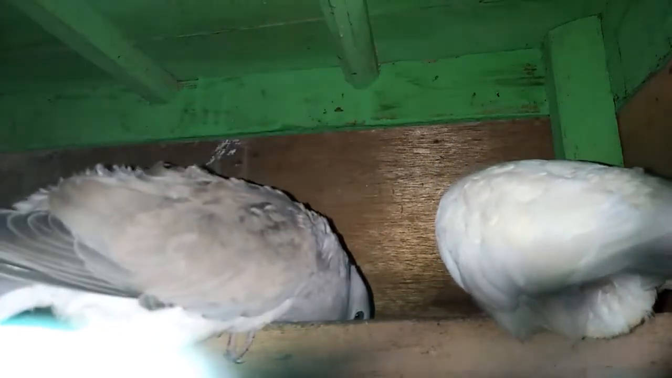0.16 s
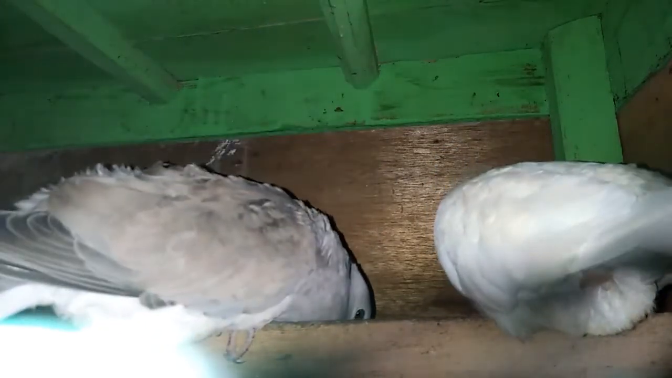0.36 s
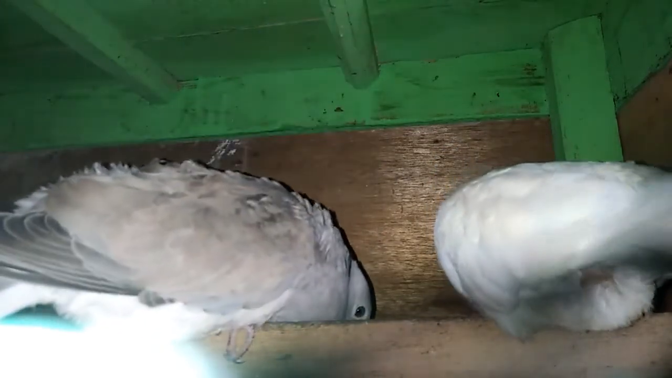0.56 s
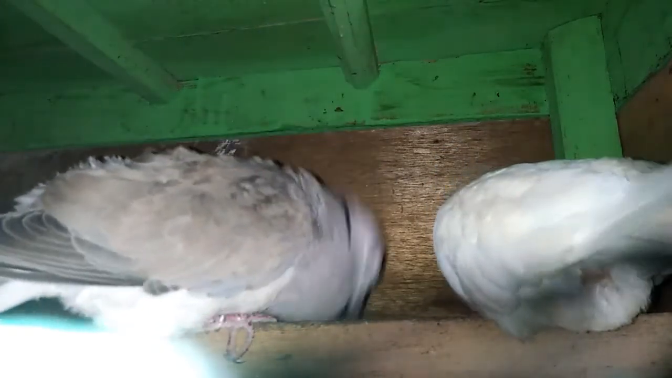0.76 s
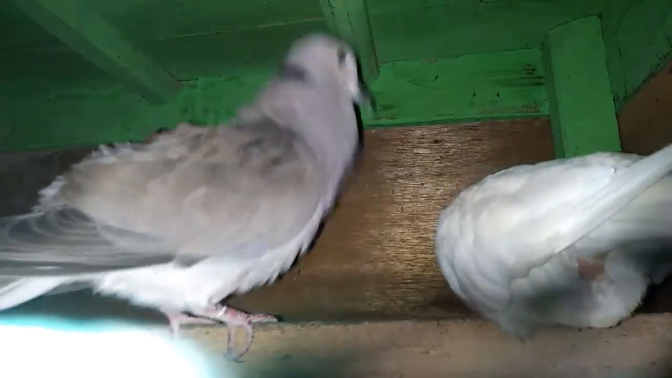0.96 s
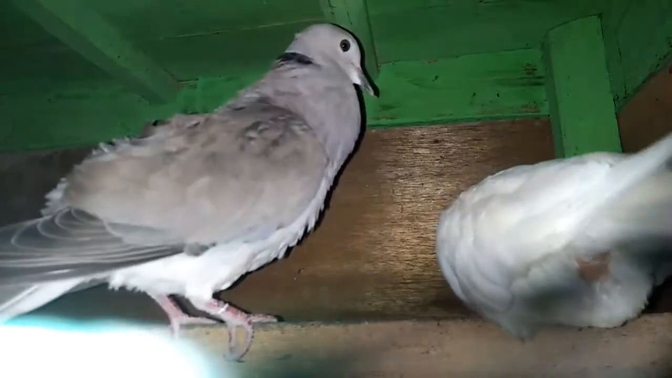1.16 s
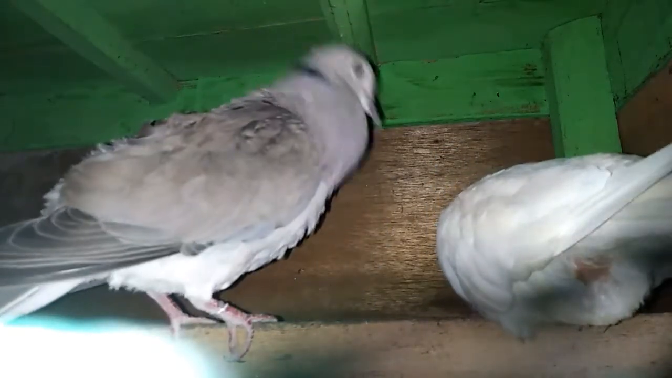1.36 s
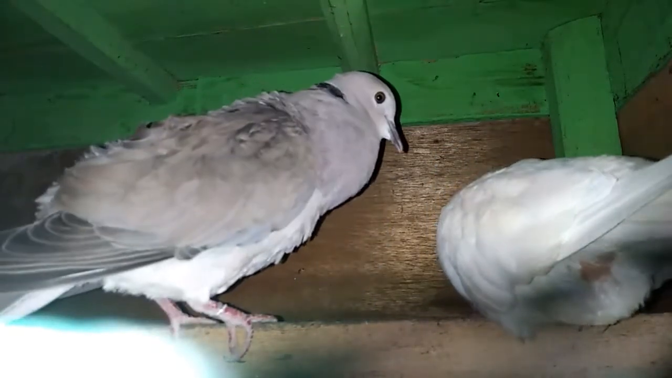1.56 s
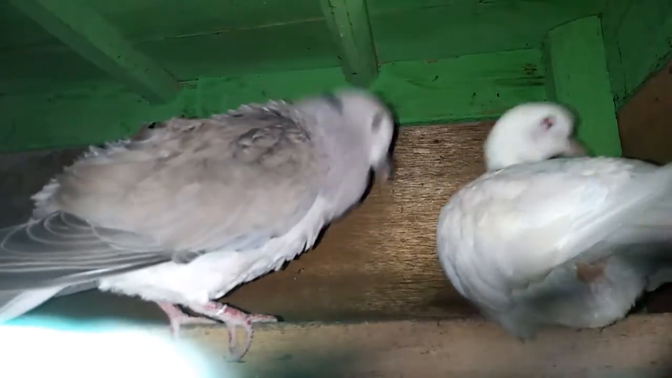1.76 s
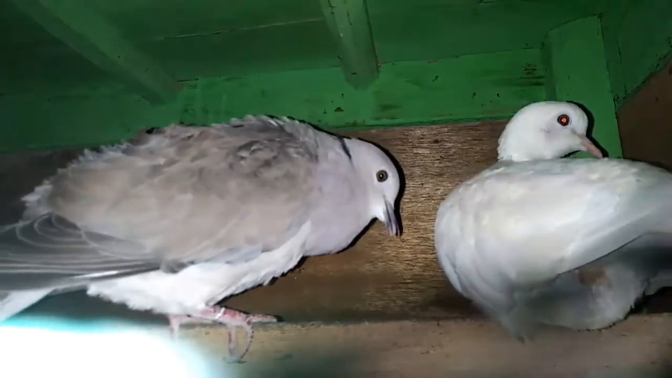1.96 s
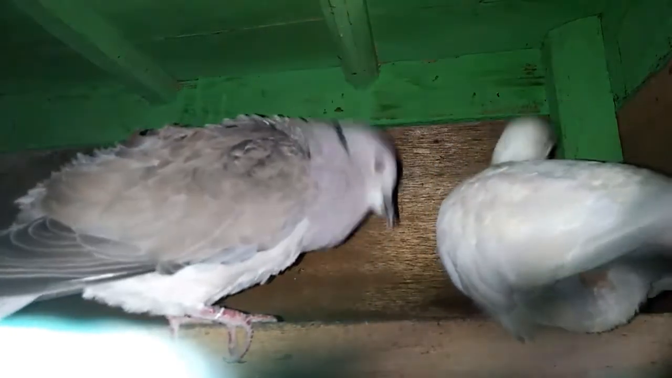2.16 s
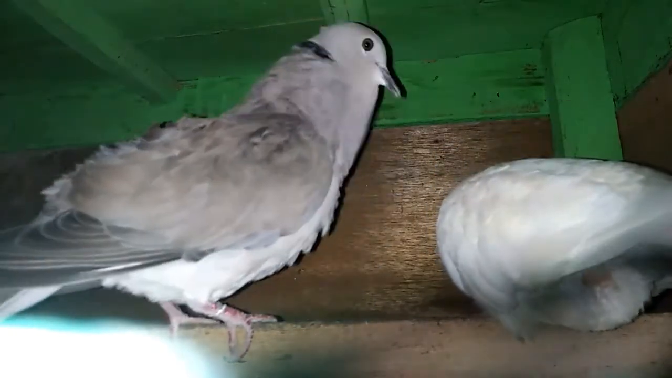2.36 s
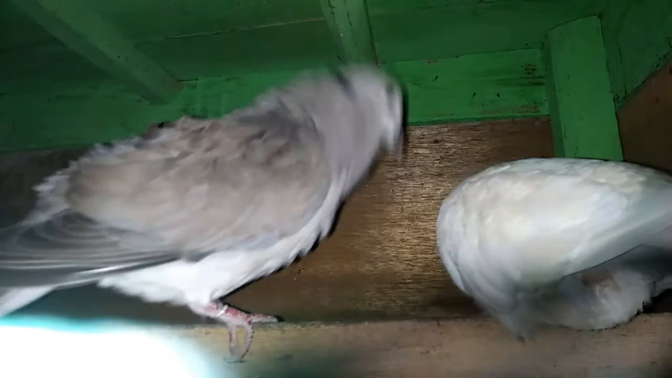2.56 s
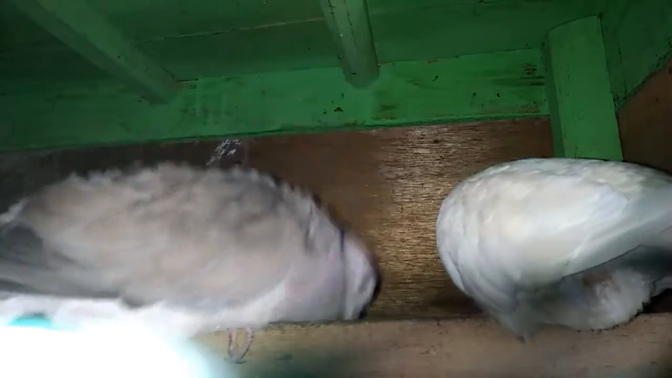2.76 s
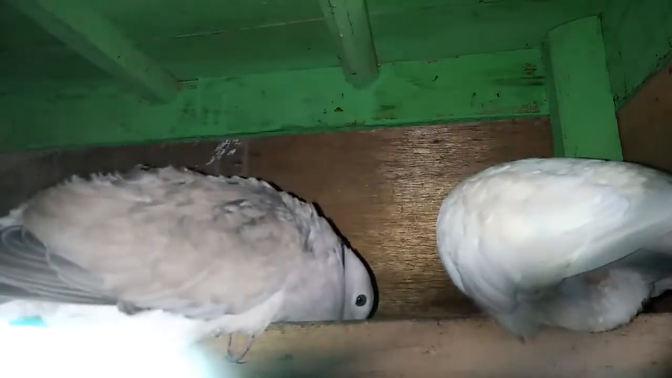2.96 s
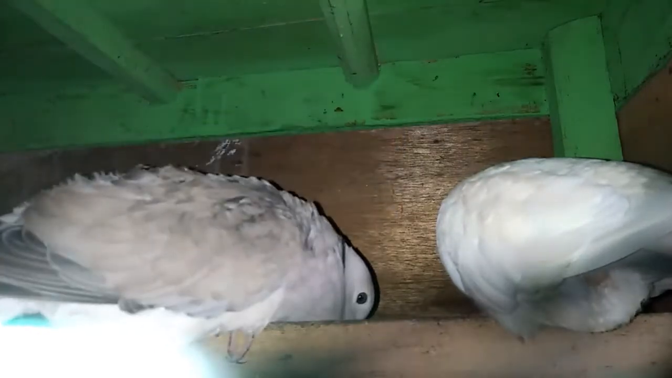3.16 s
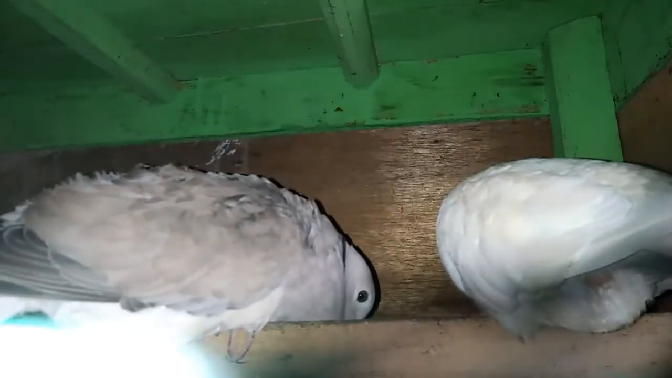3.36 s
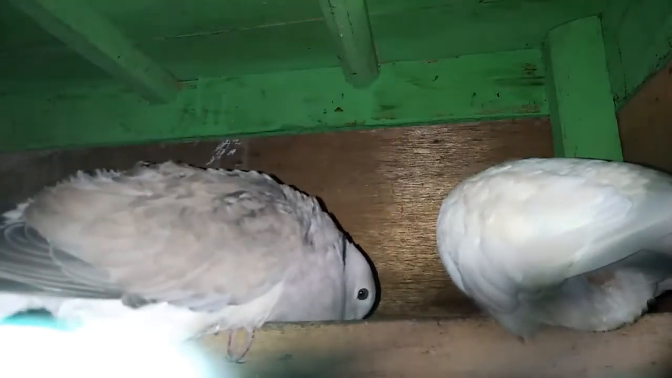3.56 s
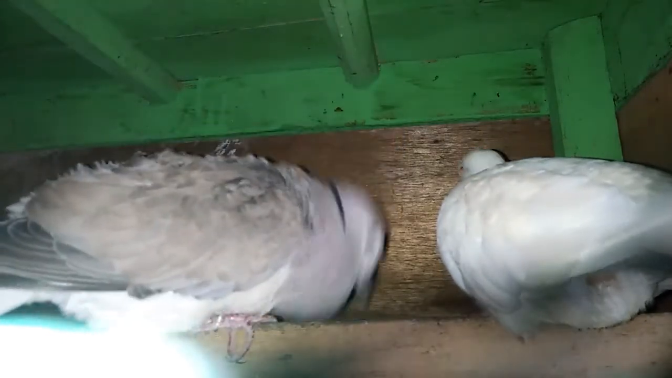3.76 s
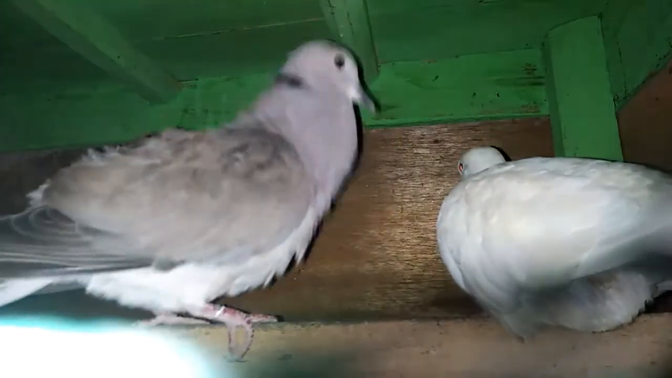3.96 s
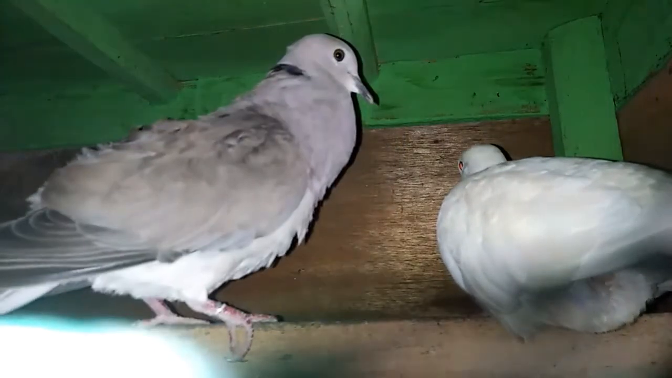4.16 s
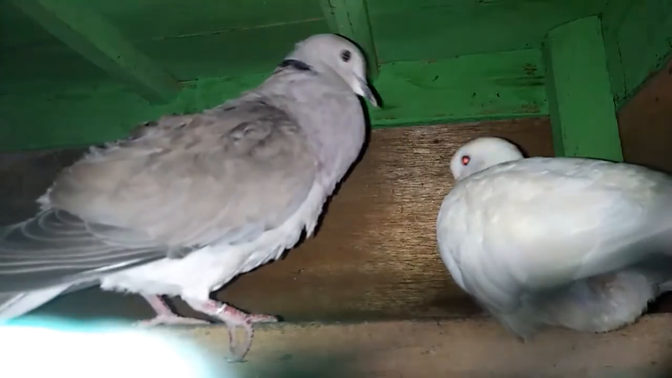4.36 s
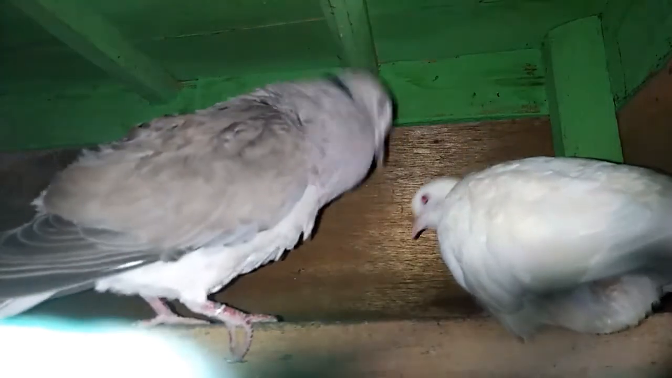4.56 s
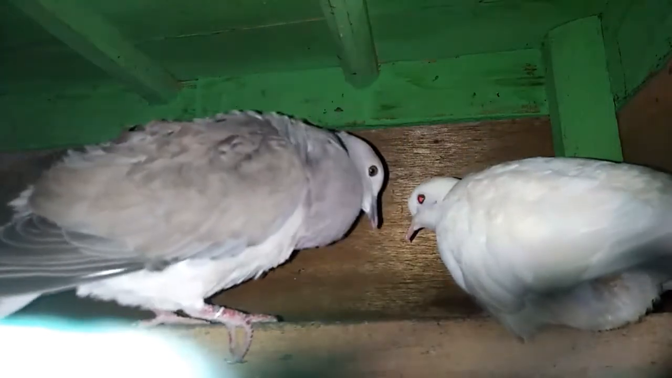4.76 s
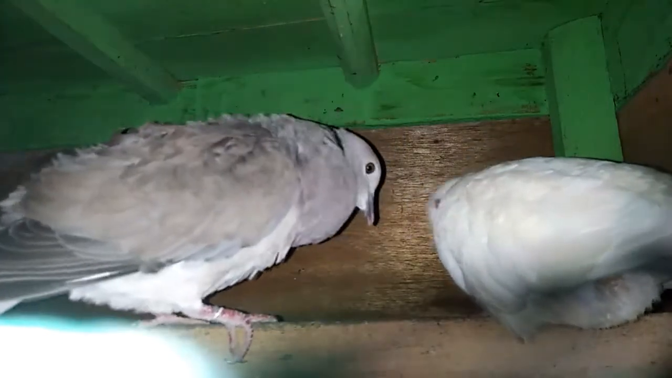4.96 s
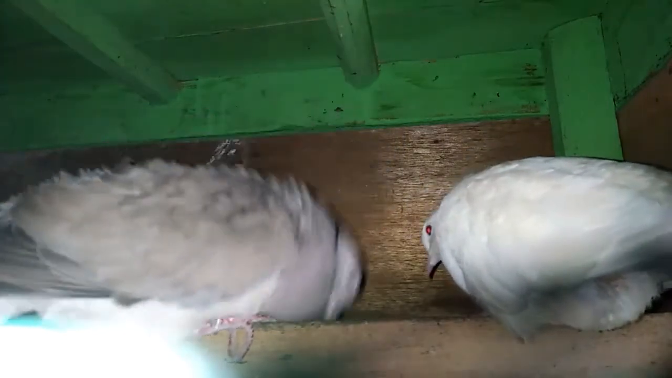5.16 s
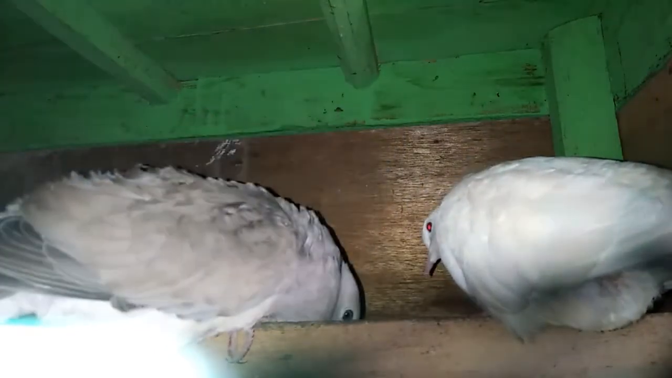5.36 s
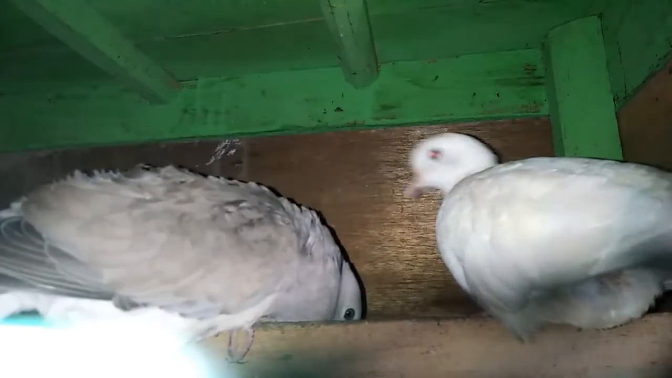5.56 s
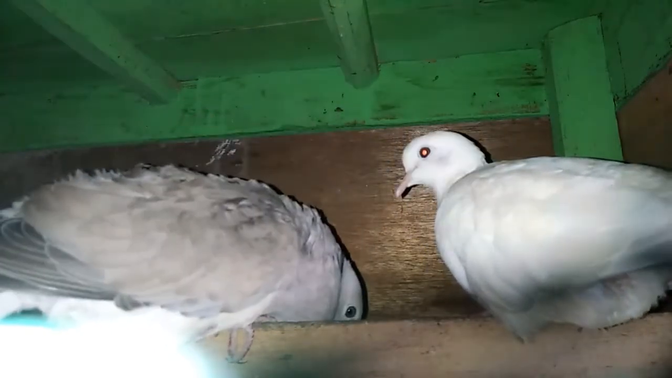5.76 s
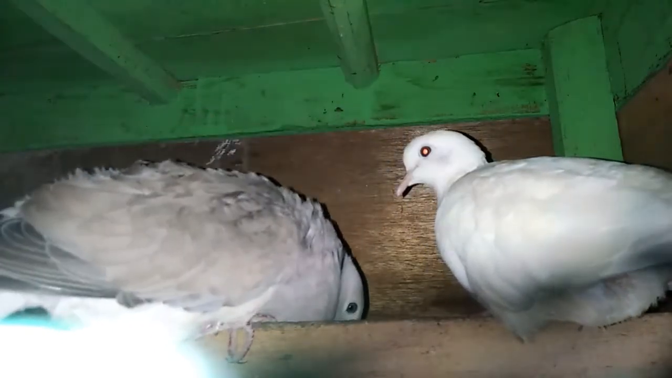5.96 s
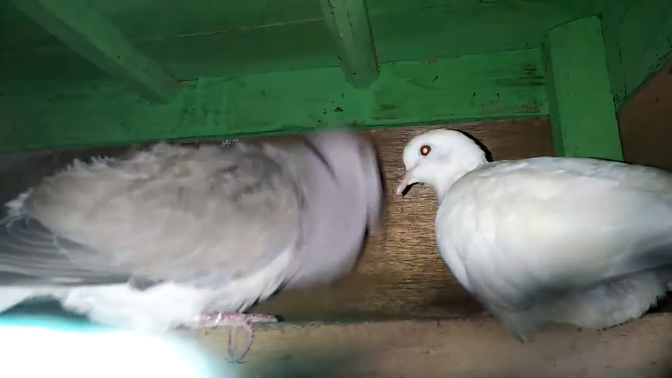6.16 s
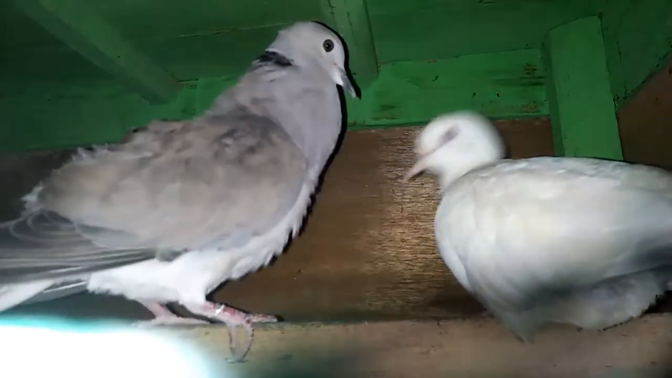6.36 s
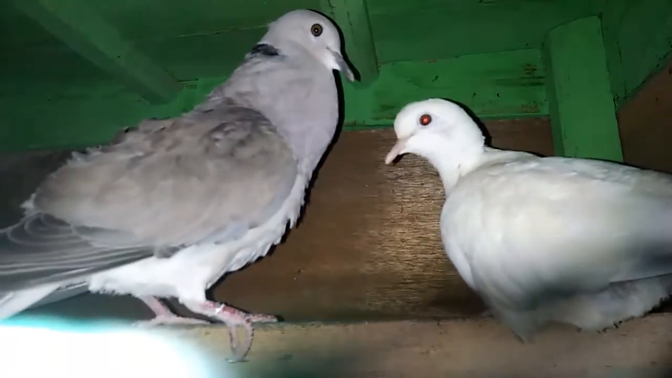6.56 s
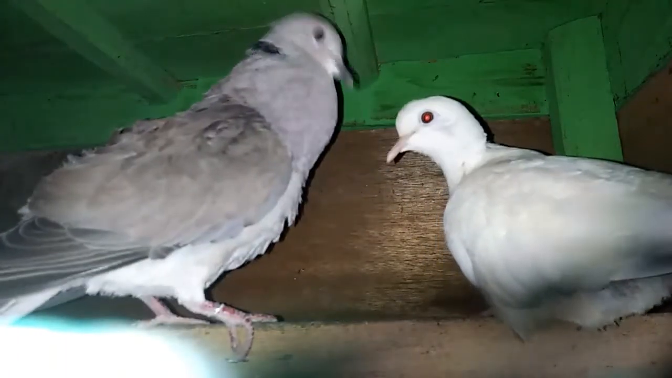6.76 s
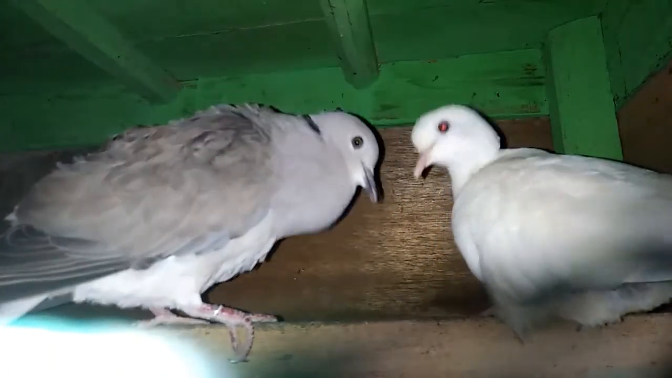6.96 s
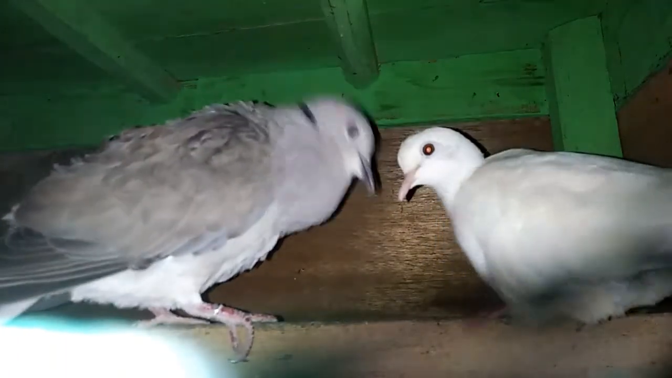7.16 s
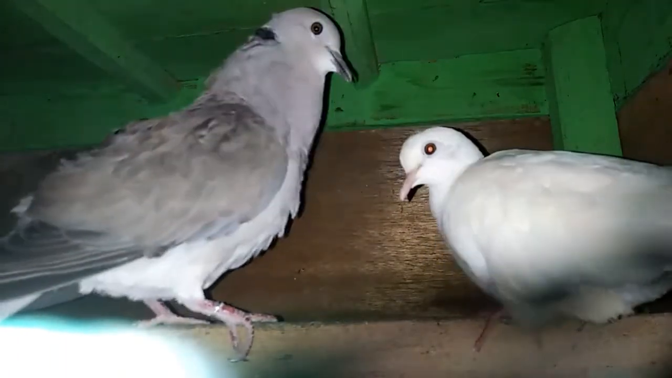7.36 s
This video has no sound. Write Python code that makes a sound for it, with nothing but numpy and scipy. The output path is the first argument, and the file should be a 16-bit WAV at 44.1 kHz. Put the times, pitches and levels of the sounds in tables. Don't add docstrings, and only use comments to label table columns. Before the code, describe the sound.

A dove coos very close in a small wooden coop on a quiet night. At 0 s the end of a coo falls away. From 0.2 s short, dipping notes ripple and lengthen, leading at about 0.8 s into a round held coo that swells, sags and drops off at 1.5 s; a faint low growl follows until 2.1 s. At 2.7 s toes tap and a sharp scuff brushes the boards with a short call. A second ripple starts at 3.1 s, the long coo at 3.7 s, ending near 4.6 s, then a growl at 4.8 s. A distant vehicle nears and fades around 5.1 s as wind rumbles more. Another call comes at 5.2 s, a ripple at 5.6 s, a faint wire scrape at 6.1 s, and a held coo from 6.2 to 6.9 s. A last growl at 7.1 s and light taps at 7.4 s close it. Soft feather rustles and a faint motor hum lie beneath.

```python
import sys
import numpy as np
from scipy import signal
from scipy.io import wavfile
from scipy.ndimage import uniform_filter1d

SR = 44100
rng = np.random.default_rng(int(sys.argv[2]) if len(sys.argv) > 2 else 0)


def output_pcm(signal):
    pcm = np.clip(np.atleast_2d(signal).T, -1, 1) * 32767
    wavfile.write(sys.argv[1], SR, np.round(pcm).astype(np.int16))


def field_ratio(decibels):
    return 10 ** (np.asarray(decibels, dtype=float) / 20)


N = 327222


def evened(x):
    return x / np.sqrt(np.mean(x ** 2) + 1e-20)


def add(mix, s, sound):
    part = mix[round(s * SR):][:len(sound)]
    part += sound[:len(part)]


def columns(rows):
    s, *cols = np.transpose(rows)
    t = np.arange(s[0], s[-1], 1 / SR)
    return s[0], [np.interp(t, s, c) for c in cols]


def resonate(x, hz, width):
    turn = np.exp(2j * np.pi * np.cumsum(hz * np.ones(len(x))) / SR)
    r = np.exp(-np.pi * width / SR)
    smooth = signal.lfilter([1 - r], [1, -r], x / turn + 1e-18)
    return 2 * (turn * smooth).real


def noise(points, patchy_db, size=1024):
    hz, (f, level) = np.fft.rfftfreq(size, 1 / SR), np.transpose(points)
    a, b, patches = rng.standard_normal((N * 4 // size + 5, len(hz), 3)).T
    patches = uniform_filter1d(patches, size=6, axis=0)
    patches = evened(uniform_filter1d(patches, size=8, axis=1))
    colour_db = np.interp(np.log(hz + 1), np.log(f + 1), level, left=-120, right=-120)
    frames = (a + 1j * b) * field_ratio(colour_db[:, None] + patchy_db * patches)
    return evened(signal.istft(frames, nperseg=size, noverlap=size * 3 // 4)[1][:N])


def voice(hz, partials_db, rise, fall):
    turns, t = np.cumsum(hz) / SR + rng.random(), np.arange(len(hz)) / SR
    ends = np.minimum(t / rise, 1) * np.minimum(t[::-1] / fall, 1)
    partials = sum(field_ratio(db) * np.sin(2 * np.pi * (k + 1) * turns) for k, db in enumerate(partials_db))
    return np.sqrt(2) * ends * partials


def held_notes():
    # start_s, pitch_hz, level_db
    held = [
        [(0.765, 519, -45.5), (0.875, 510, -45.8), (0.935, 507.6, -61), (0.965, 508.3, -46), (1.05, 510, -35),
         (1.2, 510.9, -32.4), (1.28, 507.5, -30.7), (1.38, 500.5, -27.8), (1.46, 487, -26.8)],
        [(3.722, 518, -46.5), (3.86, 506.5, -51.4), (3.905, 509.5, -59.9), (3.985, 511, -41.8),
         (4.07, 515.2, -38.4), (4.22, 511.7, -34.6), (4.38, 505.1, -29.4), (4.5, 490.1, -25.6),
         (4.527, 482.2, -25.6)],
        [(6.245, 515, -43.3), (6.285, 516.5, -59), (6.335, 511.5, -43.8), (6.4, 508.8, -34.5),
         (6.54, 512, -33.6), (6.72, 506.1, -28.6), (6.79, 501.6, -27.1), (6.868, 490, -25.2),
         (6.886, 482.4, -23.8)],
    ]
    even_db = [-21, -17]
    # freq_hz, level_db (per Hz)
    breath = [(230, -16), (300, -5.5), (370, -15), (440, -2), (580, -2.5), (660, -8.5), (1050, -8.5),
              (4000, -36)]
    stop_s, fall_s = 0.017, 0.011
    out, air = np.zeros(N), noise(breath, 2.2)
    for rows in held:
        s, curves = columns(rows)
        curves = [np.pad(c, (0, round(stop_s * SR)), "edge") for c in curves]
        hz, first_db = (uniform_filter1d(c, size=500) for c in curves)
        full = np.clip(1 + (np.maximum.accumulate(first_db) + 39) / 11, 0, 1)
        sag_db = 0.63 * np.maximum(509.6 - hz, 0) ** 1.08
        third_db = -64.5 + 6 * full - full * sag_db
        waver = uniform_filter1d(rng.standard_normal(len(hz)), size=500)
        hz = hz * (1 + 0.04 * waver)
        flutter = uniform_filter1d(rng.standard_normal(len(hz)), size=200)
        shimmer_db = 0.35 * evened(uniform_filter1d(flutter, size=200))
        first_db = first_db + 0.3 + shimmer_db
        third_db = third_db + 3 * shimmer_db
        second_db = third_db + even_db[0]
        fourth_db = third_db + even_db[1] + 8 * (full - 1)
        add(out, s, voice(hz, [first_db, second_db, third_db, fourth_db], 0.0051, fall_s))
        puff = field_ratio(-53.5 + 0.45 * first_db) * signal.windows.tukey(len(hz), 0.06)
        add(out, s, puff * air[round(s * SR):][:len(hz)])
    return out


def short_voice(hz):
    partials_db = [-3, -12.5, -28, -20.5]
    partials_tilt_db = [6, -7.5, 13, -13]
    low_hz, rise_s = 340, 0.012
    t = np.arange(len(hz)) / SR
    late_db = -14 * np.maximum(1 - t / rise_s, 0)
    flutter_db = 3.5 * np.sin(2 * np.pi * (t * rng.uniform(18, 30) + rng.random()))
    upper_db = late_db + flutter_db
    levels = [db + tilt_db * (hz - low_hz) / 100 + (k > 0) * upper_db
              for k, (db, tilt_db) in enumerate(zip(partials_db, partials_tilt_db))]
    return voice(hz, levels, 0.0021, 0.005)


def ripple_pitch(length, start, end):
    u = np.linspace(0, 1, round(length * SR))
    dip_hz = 351 - 78 * np.exp(-(length / 0.043) ** 1.9)
    snap = np.exp(-(u / min(0.24 / length, 0.24)) ** 5.7)
    climb = np.maximum(1 - (1 - u) / 0.39, 0) ** 0.63
    scoop_hz = 77 * np.exp(-u * length / 0.0046)
    return dip_hz + (start - dip_hz) * snap + (end - dip_hz) * climb - scoop_hz


def short_notes():
    # start_s, length_s, start_hz, end_hz, effort_db
    ripple = [(0.203, 0.0079, 330, 291, -66.5), (0.259, 0.024, 282, 327, -64),
              (0.322, 0.039, 409, 306, -63), (0.396, 0.058, 427, 363, -58.5), (0.467, 0.061, 462, 351, -58),
              (0.551, 0.075, 452, 368, -52), (0.654, 0.106, 478, 483, -51.5),
              (3.124, 0.021, 280, 332, -64.5), (3.188, 0.029, 344, 322, -63),
              (3.254, 0.037, 393, 294, -62.5), (3.321, 0.057, 385, 360, -56.5),
              (3.397, 0.065, 459, 340, -59.5), (3.484, 0.088, 446.4, 441, -54),
              (3.603, 0.12, 466, 480, -52.5), (5.624, 0.031, 279, 275, -71.5),
              (5.687, 0.034, 343, 330, -64.5), (5.756, 0.043, 403, 374, -60),
              (5.83, 0.059, 440, 376, -59.5), (5.912, 0.075, 464, 367, -56),
              (6.003, 0.094, 467, 466, -52.5), (6.128, 0.12, 477, 480, -54)]
    # start_s, pitch_hz, effort_db
    short_calls = [
        [(2.729, 286, -62.5), (2.761, 416, -51), (2.778, 405, -50), (2.778, 496, -57), (2.808, 516.3, -55),
         (2.852, 504, -69), (2.875, 500, -53.5), (2.877, 420, -56), (2.893, 402, -60.5)],
        [(5.218, 289.7, -64.5), (5.26, 429.7, -48), (5.27, 432, -54.5), (5.274, 540.4, -60.5),
         (5.295, 511, -68.5), (5.318, 501, -57), (5.375, 496, -53.5), (5.389, 400, -56)],
    ]
    # start_s, pitch_hz, effort_db
    drops = [
        [(0, 488, -62), (.03, 467, -102), (.07, 412, -74)],
        [(1.464, 447, -56.5), (1.488, 371, -49.5), (1.53, 315, -67)],
        [(4.53, 444, -57.5), (4.57, 393, -49.5), (4.63, 316.6, -61.5)],
        [(6.888, 457, -60), (6.912, 369, -52.5), (6.955, 306, -65)],
    ]
    # freq_hz, width_hz, gain_db
    coop = [(319.2, 25, 13), (428.6, 32.5, 13), (466, 27.9, 10.5), (563.6, 28, 18.5), (717, 14, -1.5),
            (828, 21, 6.5), (1290, 21, 0.5), (1524, 24, -2.5)]
    out = np.zeros(N)
    for s, length, start, end, db in ripple:
        add(out, s, field_ratio(db) * short_voice(ripple_pitch(length, start, end)))
    for rows in short_calls + drops:
        s, (hz, db) = columns(rows)
        add(out, s, field_ratio(db) * short_voice(uniform_filter1d(hz, size=300)))
    return sum(field_ratio(db) * resonate(out, hz, width) for hz, width, db in coop)


def growl():
    # start_s, length_s, pulse_rate_hz, level_db, throat_start_hz
    growls = [
        (1.6, 0.2, 168, -63, 555),
        (1.77, 0.307, 107, -58, 580),
        (4.797, 0.342, 109.8, -56.5, 562),
        (7.121, 0.37, 106.7, -57.5, 565.5),
    ]
    out = np.zeros(N)
    for s, length, rate_hz, db, start_hz in growls:
        t = np.arange(0, length, 1 / SR)
        hz = rate_hz * (1 + 0.074 * np.exp(-t / 0.0511) + 0.1 * (t / length) ** 3)
        throat_hz = start_hz + 244 * t
        jitter = 0.18 * uniform_filter1d(rng.standard_normal(len(hz)), size=300)
        turns = np.cumsum(hz * (1 + jitter)) / SR
        sound = sum(np.cos(2 * np.pi * k * turns) for k in range(3, 13))
        sound = sound + 3.5 * (turns % 1 < 0.5) * rng.standard_normal(len(hz))
        for width_hz in (125, 160, 170):
            sound = resonate(sound, throat_hz, width_hz)
        chest = field_ratio(-18.5) * np.sin(2 * np.pi * turns)
        level = field_ratio(db - 3 * np.sin(np.pi * t / length))
        ends = np.minimum(t / 0.025, 1) * np.minimum(t[::-1] / 0.09, 1)
        add(out, s, level * (evened(sound) + chest) * ends)
    return out


def side_tones():
    # start_s, length_s, pitch_hz, level_db
    tones = [
        (3.797, .2, 408, -69.5),
        (3.793, 0.17, 596, -70.5),
        (6.298, .56, 311.7, -71.5),
    ]
    out = np.zeros(N)
    for s, length, hz, db in tones:
        t = np.arange(0, length, 1 / SR)
        tone = resonate(np.sin(2 * np.pi * hz * t) + 12 * rng.standard_normal(len(t)), hz, 14)
        add(out, s, field_ratio(db) * evened(tone) * signal.windows.tukey(len(t), 0.4))
    return out


def wall(x):
    echo_s, echo_db = 0.0515, -19.5
    out = np.zeros(N)
    for k in (1, 2, 3):
        add(out, k * echo_s, field_ratio(k * echo_db) * resonate(x, 480, 120))
    return out


def yard(x):
    t60_s, spacing = 0.3, 22
    taps = np.zeros(SR // 2)
    at = np.arange(200, len(taps) - spacing, spacing)
    signs = rng.choice([-1., 1.], len(at))
    taps[at + rng.integers(0, spacing, len(at))] = signs * field_ratio(-60 * at / SR / t60_s)
    return signal.fftconvolve(x, taps / np.linalg.norm(taps))[:N]


def scuffs():
    # start_s, level_db, stroke_s, t60_s, low_band_db
    brushes = [
        (1.39, -70.5, 0.014, 0.17, 0),
        (2.694, -99.5, 0.005, 0.36, 28.5),
        (2.774, -68, .045, .064, .5),
        (2.792, -52, 0.017, .23, -14),
        (2.833, -66.5, 0.044, .11, -5.5),
        (5.136, -71, .04, .15, 9.5),
        (6.093, -76.5, .063, 0.056, -15),
        (7.363, -86, 0.13, .1, 16),
    ]
    # freq_hz, level_db (per Hz)
    bright = [(1760, -46.5), (3000, -17.5), (3420, -11.5), (4880, -8.5), (5420, -7), (7440, 2.5),
              (8200, -1), (13700, -10), (14200, 0)]
    # freq_hz, level_db (per Hz)
    dull = [(400, -27), (600, -5), (1100, 6.5), (1800, -1), (2800, -5.5), (4500, -41)]
    high, low = noise(bright, 2.5, size=256), noise(dull, 2.5, size=256)
    out, t = np.zeros(N), np.arange(SR // 3) / SR
    for s, db, stroke, t60, low_db in brushes:
        brush = (high + field_ratio(low_db) * low)[round(s * SR):][:len(t)]
        swell = np.minimum(t / (0.32 * stroke), 1)
        shape = swell * field_ratio(db - 60 * np.maximum(t - stroke, 0) / t60)
        add(out, s, brush * shape[:len(brush)])
    return out


def wire_drag():
    # freq_hz, width_hz, level_db
    wire = [(2630, 230, -1), (4120, 69, 2), (5630, 42, 4), (6260, 23, 13), (9030, 35, -18),
            (10300, 170, -33)]
    start_s, length_s, level_db = 6.094, 0.045, -72
    out, t = np.zeros(N), np.arange(SR // 3) / SR
    drag = rng.standard_normal(len(t)) * field_ratio(-13 * (t / length_s) ** 2)
    wires = sum(field_ratio(db) * resonate(drag, hz, 2.7 * width) for hz, width, db in wire)
    add(out, start_s, field_ratio(level_db) * evened(wires))
    return out


def knocks():
    # start_s, pitch_hz, level_db, t60_s
    toes = [
        (2.694, 590, -57, .03),
        (2.694, 1900, -64, .02),
        (2.705, 1000, -66, .03),
        (2.665, 760, -66, .08),
        (7.365, 1240, -63, .12),
        (7.37, 900, -64, .15),
        (7.4, 1150, -58, .06),
        (7.403, 880, -58, .06),
    ]
    out, t = np.zeros(N), np.arange(SR // 10) / SR
    for s, hz, db, t60 in toes:
        strike = np.minimum(t / 0.00033, 1)
        add(out, s, field_ratio(db - 60 * t / t60) * strike * np.sin(2 * np.pi * hz * t))
    return out


def feathers():
    # start_s, length_s, level_db, rise_share
    rustle = [
        (1.085, .24, -81, 0.28),
        (1.296, .17, -74, 0.075),
        (3.477, 0.089, -81, 0.51),
        (3.988, .2, -84.5, 0.16),
        (4.26, .29, -84.5, 0.17),
        (5.477, 0.14, -75, 0.52),
        (6.375, 0.61, -81.5, 0.17),
    ]
    # freq_hz, level_db (per Hz)
    feather = [(2650, -41), (4500, -12.5), (6060, -13.5), (7440, -3), (8390, 0), (10100, -3), (11000, -6.5),
               (14200, -11.5)]
    gain = np.zeros(N)
    for s, length, db, rise in rustle:
        u = np.linspace(0, 1, round(length * SR))
        edge = np.maximum(1 - u / rise, 0.34 * (u - rise) / (1 - rise))
        add(gain, s, field_ratio(db - 11 * edge) * signal.windows.tukey(len(u), 0.15))
    return gain * noise(feather, 1.3, size=256)


def wind_gusts():
    # peak_s, half_width_s, level_db
    gusts = [(0.0, 0.01, -60), (0.42, .08, -74.5), (0.72, 0.16, -77), (1.0, .1, -81.5), (1.2, 0.11, -71),
             (1.42, 0.15, -71), (1.6, 0.07, -70.5), (1.8, 0.14, -73), (2.07, .035, -67),
             (2.35, 0.098, -76.5), (2.7, 0.12, -72), (2.921, 0.1, -70.5), (3.25, 0.096, -72.5),
             (3.6, 0.14, -71.5), (3.95, 0.15, -71.5), (4.352, 0.23, -67), (4.599, 0.018, -64),
             (4.95, 0.22, -60.5), (5.27, 0.059, -63), (5.501, 0.22, -65.5), (5.9, 0.081, -60),
             (6.08, 0.19, -67.5), (6.451, 0.17, -78), (6.799, .1, -73), (7.24, 0.083, -58.5),
             (7.38, 0.091, -64)]
    # freq_hz, level_db (per Hz)
    rumble = [(25, -42), (42, -19), (59, -4.5), (111, 2), (161, -0.5), (199, -24), (230, -11), (300, -43.5),
              (510, -120)]
    t, wind = np.arange(N) / SR, noise(rumble, 2., size=2048)
    calm_db = -86.5
    gain = field_ratio(calm_db) + sum(field_ratio(db) * np.exp(-((t - s) / width) ** 2) for s, width, db in gusts)
    boom = field_ratio(-8.5) * resonate(wind, 113, 19)
    return gain * evened(wind + boom)


def vehicle():
    # freq_hz, level_db (per Hz)
    road = [(120, -43.5), (200, -17.5), (232, -22), (306, 4), (435, -33), (530, -9.5), (640, 0),
            (1090, -2.5), (1710, -14.5), (4000, -58), (5200, -82), (8800, -120)]
    # freq_hz, level_db (per Hz)
    engine = [(30, -50), (45, -18), (58, 2), (85, -3.5), (120, -32.5)]
    pass_s, near_db_per_s, away_db_per_s, round_s = 5.144, 16.5, 43, 0.18
    t = np.arange(N) / SR
    slope_db = np.where(t < pass_s, near_db_per_s, away_db_per_s) * abs(t - pass_s)
    slope_db = uniform_filter1d(slope_db, round(round_s * SR))
    tyres = field_ratio(-55.5 - slope_db) * noise(road, 2.)
    swell = field_ratio(-66) * np.exp(-((t - 5.5) / 0.75) ** 2)
    return tyres + swell * noise(engine, 1.4, size=2048)


def far_motor():
    # freq_hz, level_db
    tones = [(325, -94), (441, -91.5), (886, -89), (1108, -98.5), (1327, -95.5)]
    t, out = np.arange(N) / SR, np.zeros(N)
    for hz, db in tones:
        drive = evened(np.sin(2 * np.pi * hz * t) + 9 * rng.standard_normal(N))
        out += field_ratio(db) * 14 * resonate(drive, hz, 8.2)
    return out


def night_hiss():
    # freq_hz, level_db (per Hz)
    floor = [(120, -53), (200, -14.5), (373, -25), (438, -9), (626, -9), (817, -9.5), (1010, -10.5),
             (1130, -14), (1280, -16), (1550, -14.5), (2220, -21), (2700, -25.5), (14200, -33.5)]
    return field_ratio(-77.5) * noise(floor, 1.2)


def scene():
    dove = held_notes() + short_notes() + growl() + side_tones()
    dove = dove + wall(dove) + field_ratio(-26) * yard(dove)
    bird_moves = scuffs() + wire_drag() + knocks() + feathers()
    night = wind_gusts() + vehicle() + far_motor() + night_hiss()
    return (dove + bird_moves + night)[None]


def roll_off(x):
    return signal.sosfilt(signal.butter(12, 14320, fs=SR, output="sos"), x)


def record(dry):
    return roll_off(dry)


dry = scene()
out = record(dry)
output_pcm(out)
```